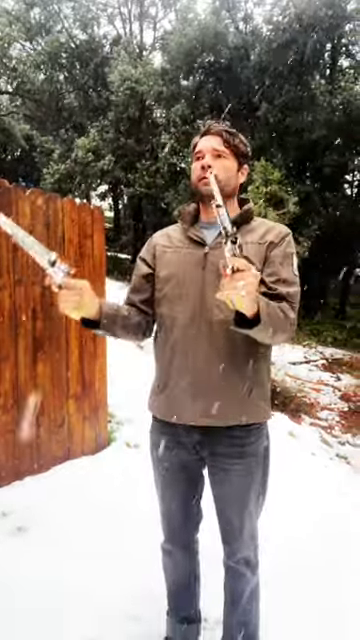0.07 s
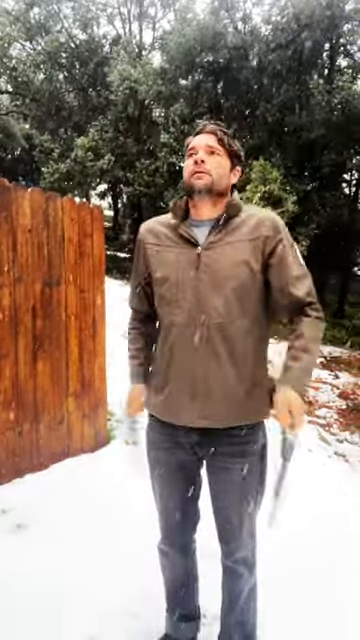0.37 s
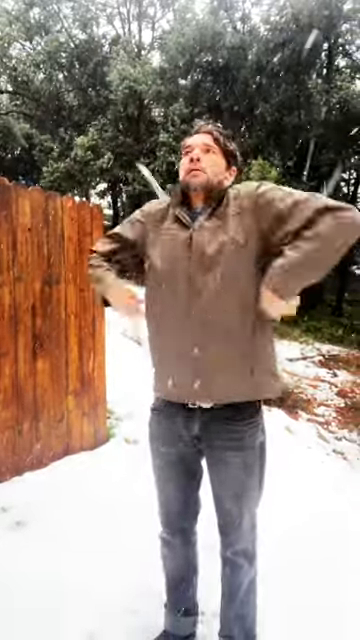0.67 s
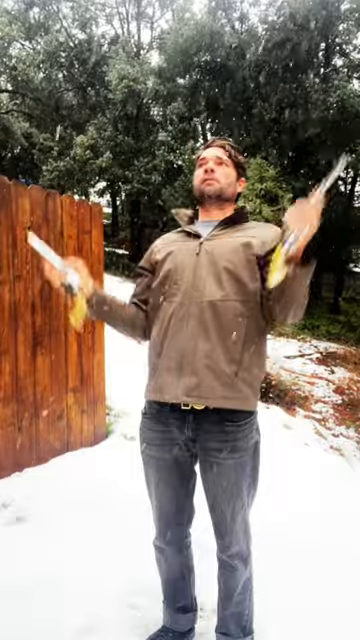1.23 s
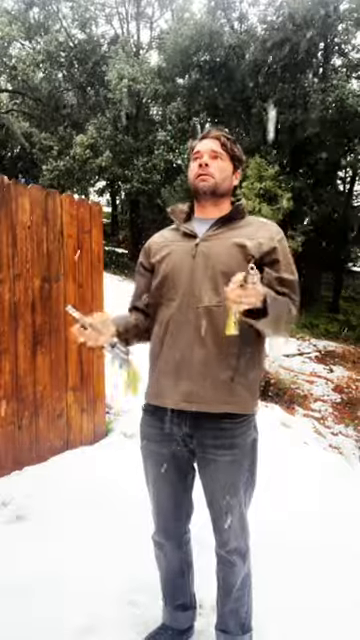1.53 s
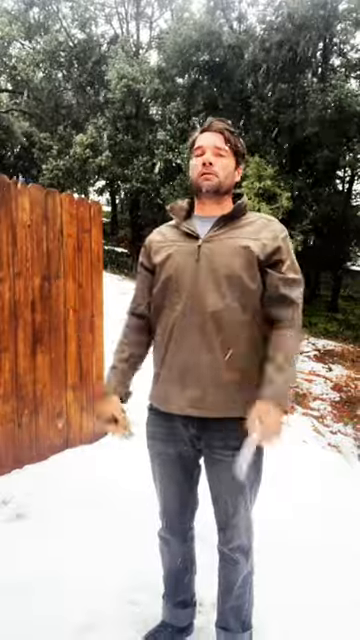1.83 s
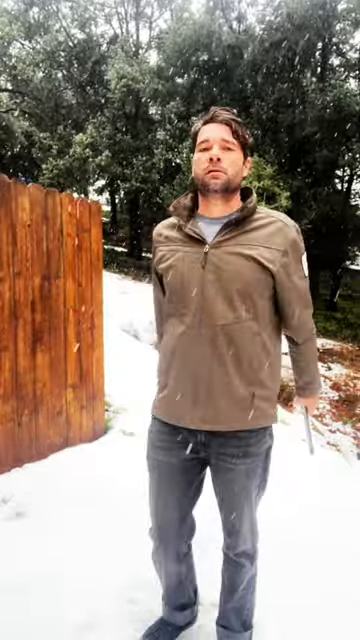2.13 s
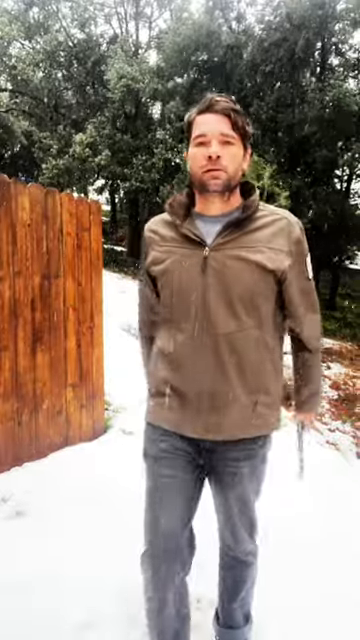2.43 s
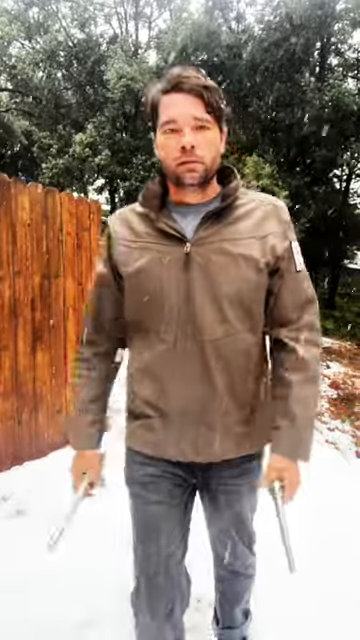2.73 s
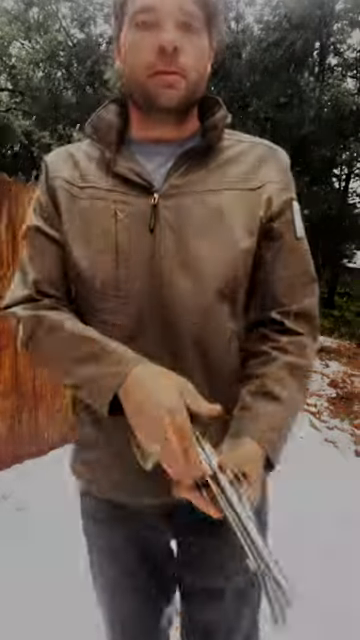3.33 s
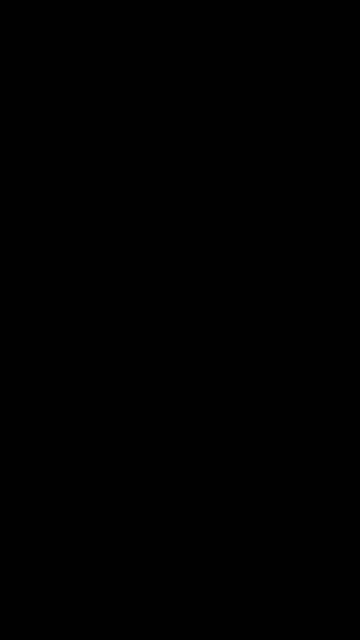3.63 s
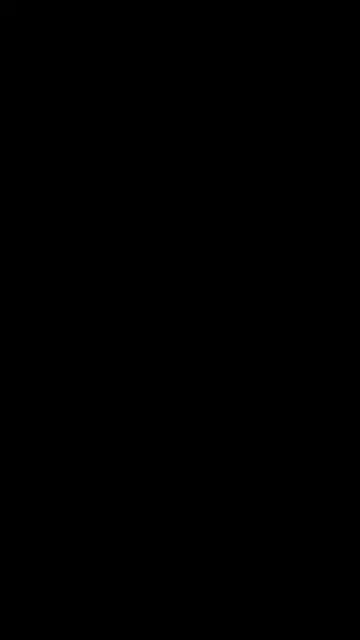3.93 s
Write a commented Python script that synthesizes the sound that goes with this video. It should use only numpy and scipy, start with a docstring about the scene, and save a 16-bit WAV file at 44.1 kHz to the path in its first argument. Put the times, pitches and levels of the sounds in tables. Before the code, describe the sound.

Metal revolvers clink briefly as they are caught outdoors in a light wind. A jacket rustles and boots crunch faintly through snow toward the microphone, ending in a quick run of sharp, close steel clacks.

```python
"""A snowy yard: a man tosses two revolvers and catches them with a loose steel rattle.
He walks closer, boots packing the snow and jacket swishing, and clacks the guns together into one hand.
Each contact is a short steel ring plus chatter; the boots are falling chirps and grainy crunch,
the cloth is swells of shaped noise. A light wind rumbles under it all and fades at the end."""
import sys
import numpy as np
from scipy import signal
from scipy.fft import rfft, irfft
from scipy.io import wavfile

SR = 44100
rng = np.random.default_rng(int(sys.argv[2]) if len(sys.argv) > 2 else 0)


def to_wav(s):
    """Save 16-bit WAV."""
    ch = np.atleast_2d(s).T  # columns
    pcm = np.round(np.clip(ch, -1, 1) * 32767)  # PCM
    wavfile.write(sys.argv[1], SR, pcm.astype(np.int16))


N = 176400
TIME = np.arange(N) / SR

# spectrum of crunching snow: f/Hz, level/dB
SNOW_SPECTRUM = [(60, -12), (300, -1), (800, -1), (2300, -23), (3200, -13), (13000, -15)]


def revolvers(size=4096):
    """Each contact rings the hand-damped steel; loose parts chatter after it and ring it again."""
    # steel contacts: t/s, level/dB, rattle T60/s, EQ near 1.5 kHz/dB, EQ near 9 kHz/dB
    clacks = [(1.1440, -5, 0.012, 2, 2.5), (1.1473, -9.5, 0.013, -7, 12), (1.155, -20, 0.014, 7, 9),
              (1.164, -10, 0.0045, -17, 3.5), (1.1746, -20, 0.01, -2, 1), (1.2005, -25, 0.021, -8, 13.5),
              (1.318, -22.5, 0.013, 4.5, 4), (2.162, -18.5, 0.001, 4, -8), (2.9724, -23.5, 0.053, -39, 0.5),
              (3.153, -14, 0.038, 0.5, -2), (3.178, -14.5, 0.036, -1, 1), (3.2345, 1.5, 0.029, 5.5, -6),
              (3.2639, 9, 0.0068, 1, -3), (3.277, -8.5, 0.039, 6, -9), (3.2863, -13, 0.0045, -13.5, 9.5),
              (3.346, 6, 0.029, 6.5, 0.5), (3.35, -7.5, 0.018, 3, 13), (3.366, -17, 0.0022, 22.5, -7.5),
              (3.3867, -17.5, 0.0087, 18.5, 3), (3.415, -5, 0.0053, 2, 11.5)]
    # ringing modes of a revolver: f/Hz, level/dB
    modes = [(1350, 5), (1510, 2), (1950, 7), (2500, -7.5), (3300, 4), (4030, -2), (4510, 10), (6100, 11.5),
             (7020, 11), (9300, 8)]
    # spectrum of the crack of steel on steel: f/Hz, level/dB
    crack = [(100, -28), (900, -14.5), (1450, -6.5), (7000, -5), (11500, -7), (16000, -44)]
    ring_t60, contact_s = 0.013, 0.00046
    ring_db, chatter_db = -8.5, -4.5
    t, out = np.arange(size) / SR, np.zeros(N)
    ring = sum((-1) ** k * amp(db - 60 * t / ring_t60) * np.sin(2 * np.pi * hz * t)
               for k, (hz, db) in enumerate(modes))
    onset = 1 - np.exp(-t / contact_s)
    clink = unit(click(crack, 2 * size)) + amp(ring_db) * unit(ring)
    for s, db, rattle_t60, low_db, high_db in clacks:
        rattle = rng.standard_normal(size) * onset * amp(-60 * t / rattle_t60)
        chatter = signal.fftconvolve(rattle, clink)[:size]
        body = amp(ring_db) * unit(ring * onset) + amp(chatter_db) * unit(chatter)
        eq = click([(1100, 0.0018), (1500, low_db), (2100, low_db),
                    (2900, 0.01), (5000, 0.0031), (8500, high_db)])
        add(out, s, amp(db) * signal.fftconvolve(unit(body), eq) / np.sqrt(size))
    return out


def boots(size=4096):
    """Snow gives way under a boot: a short falling chirp, then crumbling."""
    # boots packing the snow: t/s, level/dB, final f/Hz
    thumps = [(2.169, -37, 369), (2.5912, -35.5, 180), (2.6341, -31, 156), (3.1542, -23, 205),
              (3.32, -35.5, 259), (3.4187, -33, 153.7), (3.427, -33, 117.7)]
    chirp_s, attack_s = 0.001915, 0.0027
    crumble_db, crumble_s = -8.5, 0.0075
    t, out = np.arange(size) / SR, np.zeros(N)
    push = (t / attack_s * np.exp(1 - t / attack_s)) ** 2
    crumble_envelope = np.minimum(t / attack_s, 1) * np.exp(-t / crumble_s)
    for s, db, final_hz in thumps:
        pitch = final_hz * (1 + 4.56 * np.exp(-t / chirp_s))
        thump = push * np.sin(2 * np.pi * np.cumsum(pitch) / SR)
        crumble = amp(crumble_db) * colour(rng.standard_normal(size), SNOW_SPECTRUM) * crumble_envelope
        add(out, s, amp(db) * (crumble - thump))
    return out


def scuffs():
    """Fine grains of snow crunch under the sliding soles."""
    # sole slides: peak t/s, level/dB, length/s
    slides = [(1.991, -56, 0.18), (2.47, -54.5, 0.068), (2.627, -55, 0.059), (2.738, -46.5, 0.013),
              (3.27, -53.5, 0.16), (3.47, -48, 0.08)]
    grains = colour(noise() * flutter(per_s=5000, depth_db=1.5), SNOW_SPECTRUM)
    return grains * sum(amp(db) * swell(s, length) for s, db, length in slides)


def jacket():
    """The weave hisses with each swing of an arm."""
    # jacket and hands brushing: peak t/s, level/dB, length/s, tilt/(dB per octave)
    swishes = [(0.259, -55, 0.05, -1), (0.376, -51, 0.031, 1), (0.6, -57.5, 0.079, 2),
               (1.197, -49.5, 0.087, -0.5), (1.97, -57.5, 0.19, 3.5), (2.197, -49, 0.029, 6.5),
               (2.322, -53.5, 0.047, 2), (2.457, -46.5, 0.046, -1.5), (2.654, -50, 0.011, -3.5),
               (2.788, -60.5, 0.36, 1.5), (3.384, -47.5, 0.21, 2.5), (3.501, -47, 0.043, 7.5),
               (3.62, -54.5, 0.023, 7.5), (3.819, -50.5, 0.034, 2.5)]
    # spectrum of sliding cloth: f/Hz, level/dB
    cloth = [(100, -14.5), (600, 3.5), (2400, 4.5), (3000, -0.5), (6700, 0.5), (11900, -1.5),
             (13300, -24.5)]
    weave = noise() * flutter(per_s=900, depth_db=3)
    return sum(amp(db) * swell(s, length) * colour(weave, cloth, tilt) for s, db, length, tilt in swishes)


def rubs(length_s=0.013, width_octaves=0.62):
    """Cloth, hands and packed snow rub in brief, gritty bands of noise."""
    # short rubs: peak t/s, level/dB, centre f/Hz
    touches = [(.642, -53, 584), (0.864, -56.5, 910), (1.301, -49, 1290), (1.863, -54, 700),
               (1.901, -54.5, 1190), (1.978, -52, 700)]
    grit, hz = rfft(noise()), np.fft.rfftfreq(N, 1 / SR) + 1
    out = np.zeros((2, N))
    for s, db, centre_hz in touches:
        band = np.exp(-(np.log2(hz / centre_hz) / width_octaves) ** 2 / 2)
        out += amp(db) * swell(s, length_s) * unit(irfft(grit * band, N))
    return out


def wind():
    """A wash of air in the trees over a lumpy rumble."""
    # spectrum of the wash: f/Hz, level/dB
    air_spectrum = [(70, -38), (210, 2), (1150, -5.5), (2300, -14), (3300, -27.5), (11500, -26)]
    # rise and fall of the wash: t/s, level/dB
    air_level = [(0, -63), (.2, -55), (.65, -55.5), (1.45, -62.5), (1.8, -62), (3.1, -58.5), (3.75, -60.5),
                 (4, -71)]
    # spectrum of the rumble: f/Hz, level/dB
    rumble_spectrum = [(24, -55), (50, 0), (115, -1), (300, -32)]
    # rise and fall of the rumble: t/s, level/dB
    rumble_level = [(.5, -55.5), (1.4, -60), (3.68, -57.5), (3.78, -67)]
    air = colour(noise(spread=0.61), air_spectrum) * flutter(per_s=70, depth_db=2)
    rumble = colour(noise(spread=0.048), rumble_spectrum) * flutter(per_s=25, depth_db=1.2)
    return air * fader(air_level) + rumble * fader(rumble_level)


def yard(x, size=32768):
    """Adds two close echoes and a faint tail from fence and trees."""
    # decay of the tail: f/Hz, T60/s
    decay = [(1700, 0.18), (12000, 0.052)]
    # echoes off the body and the ground: delay/s, level/dB
    echoes = [(.0052, -18.5), (0.0109, -21)]
    # reverb send, falling as he comes closer: t/s, level/dB
    send = [(1.2, -4), (3.2, -12.5)]
    hz, t, bands = signal.stft(noise(spread=0.66)[:, :size], SR, nperseg=256)
    tail = signal.istft(bands * amp(-60 * t / read(decay, hz)[:, None]), SR, nperseg=256)[1]
    tail /= np.linalg.norm(tail[0])
    near = x.copy()
    for delay, db in echoes:
        add(near, delay, amp(db) * x)
    return near + signal.fftconvolve((x * fader(send))[None], tail, axes=1)[:, :N]


def amp(db):
    """Decibels to gain."""
    return 10 ** (np.asarray(db) / 20)


def unit(x):
    """Scales to rms 1."""
    return x / np.sqrt(np.mean(x ** 2) + 1e-20)


def read(points, hz):
    """Reads a table on a log-frequency axis."""
    f, value = np.transpose(points)
    return np.interp(np.log(hz + 1), np.log(f + 1), value)


def fader(points):
    """Gain over time from (t/s, level/dB) points."""
    return amp(np.interp(TIME, *np.transpose(points)))


def add(mix, s, sound):
    """Mixes a sound in at s seconds."""
    part = mix[max(round(s * SR), 0):][:len(sound)]
    part += sound[:len(part)]


def colour(x, points, tilt_db=0):
    """Filters by a spectrum and a tilt per octave above 500 Hz; rms 1."""
    hz = np.fft.rfftfreq(x.shape[-1], 1 / SR)
    gain = amp(read(points, hz) + tilt_db * np.log2(np.maximum(hz, 500)))
    return unit(irfft(rfft(x) * gain, x.shape[-1]))


def click(points, size=2048):
    """A minimum-phase click with the given spectrum: no sound before its start."""
    log_gain = np.log(amp(read(points, abs(np.fft.fftfreq(size, 1 / SR)))))
    return np.fft.ifft(np.exp(np.conj(signal.hilbert(log_gain)))).real[:size // 2]


def lowpass(x, hz):
    """Steep low-pass on both channels."""
    taps = signal.firwin(255, hz, window=("kaiser", 9), fs=SR)
    return signal.oaconvolve(x, taps[None], "same")


def noise(spread=0.1):
    """Stereo white noise; spread sets the width."""
    mid, side = rng.standard_normal((2, N))
    return np.array([mid + spread * side, mid - spread * side])


def flutter(per_s, depth_db):
    """A gain that wanders at random."""
    targets = np.clip(rng.standard_normal(N), -2.5, 2.5)
    return amp(depth_db * np.interp(TIME * per_s, np.arange(N), targets))


def swell(peak_s, length_s):
    """A smooth envelope that rises faster than it falls."""
    rising = TIME < peak_s
    u = (TIME - peak_s) / (length_s * np.where(rising, 0.6, 1))
    return np.exp(np.where(rising, -u * u / 2, 1 - np.sqrt(1 + 2 * u * u)))


def scene():
    """Bright steel in the yard over snow, cloth and wind with their top treble cut."""
    steel = yard(revolvers())
    soft = yard(boots()) + scuffs() + jacket() + rubs() + wind()
    return steel + lowpass(soft, hz=12500)


def record(dry):
    """Sets left and right slightly apart in phase and level, then cuts the highest treble."""
    # phase lead of left over right: f/Hz, phase/rad
    lead = [(50, -.08), (300, -.25), (1400, -.25), (2100, -.4), (3100, .4), (4500, .35), (6200, -.1),
            (7900, -.95), (11400, -2.1)]
    # stereo balance, left minus right: f/Hz, level/dB
    balance = [(50, .3), (350, 2), (3500, 1.8), (7000, 0)]
    hz = np.fft.rfftfreq(N, 1 / SR)
    left = amp(read(balance, hz) / 2) * np.exp(0.5j * read(lead, hz))
    stereo = irfft(rfft(dry) * np.array([left, 1 / left]), N)
    return lowpass(stereo, hz=16000)


dry = scene()
out = record(dry)
to_wav(out)
```